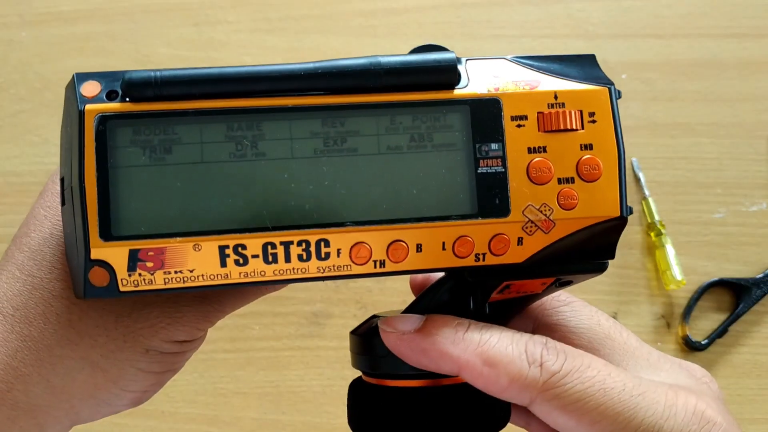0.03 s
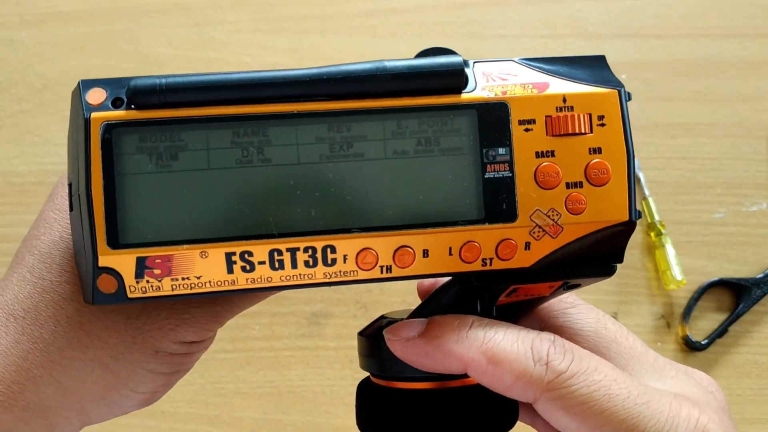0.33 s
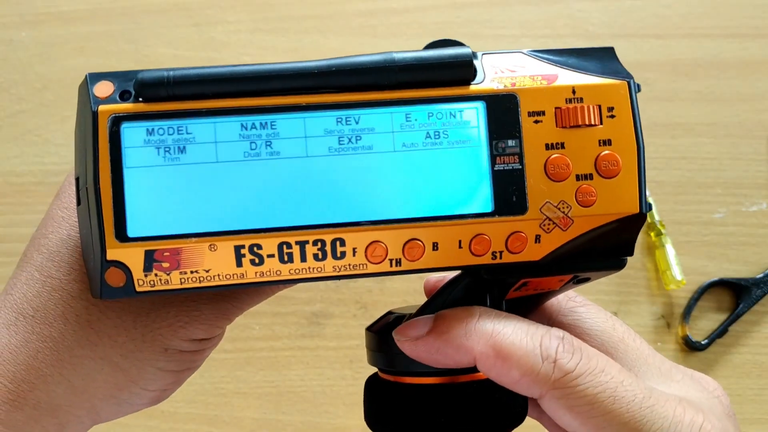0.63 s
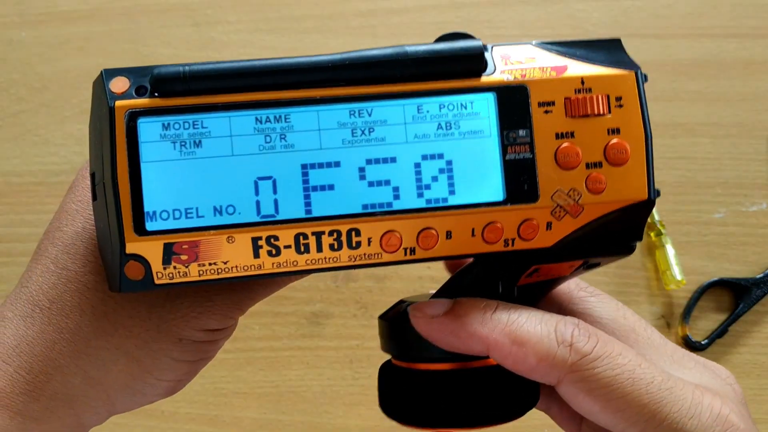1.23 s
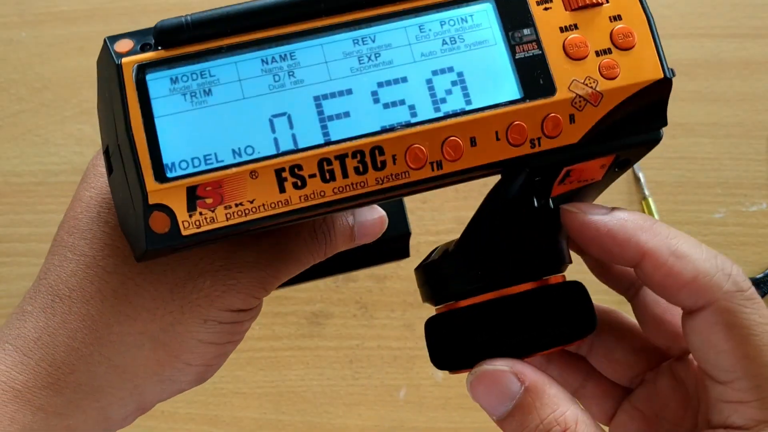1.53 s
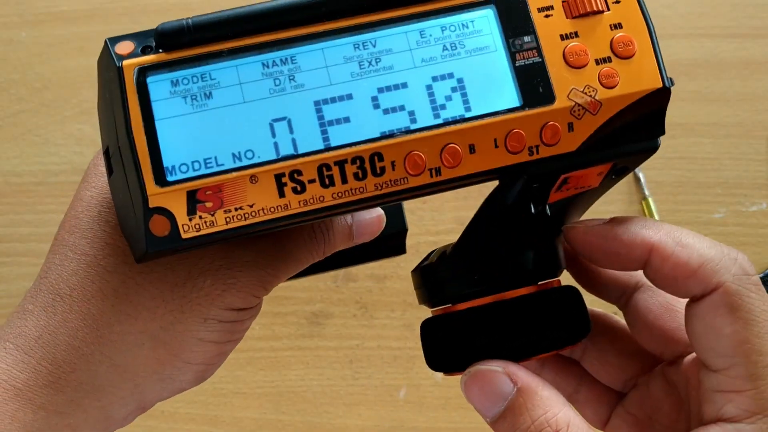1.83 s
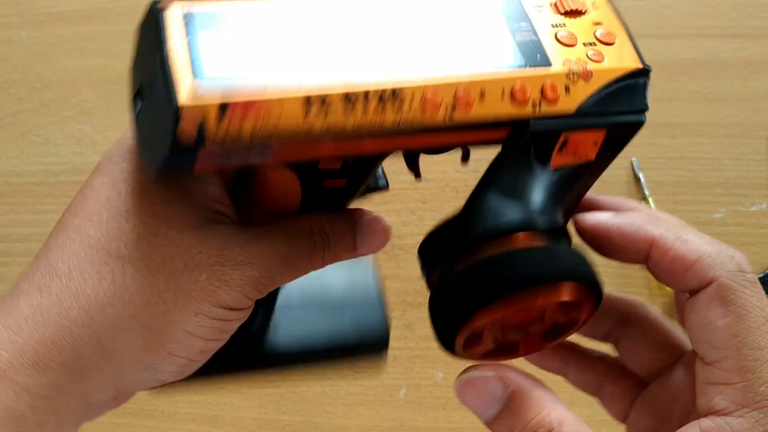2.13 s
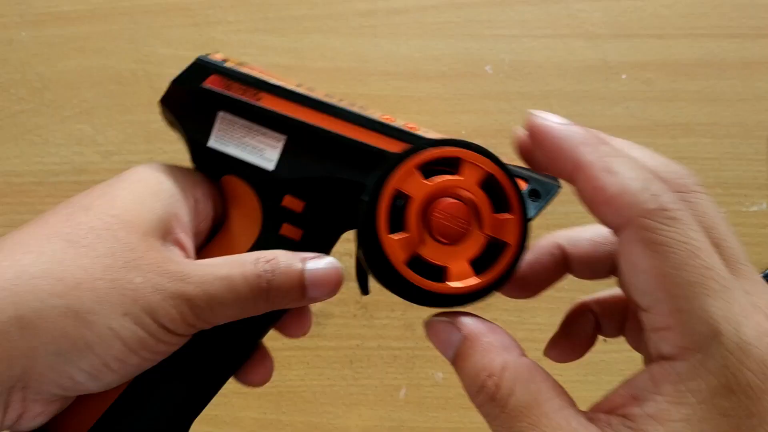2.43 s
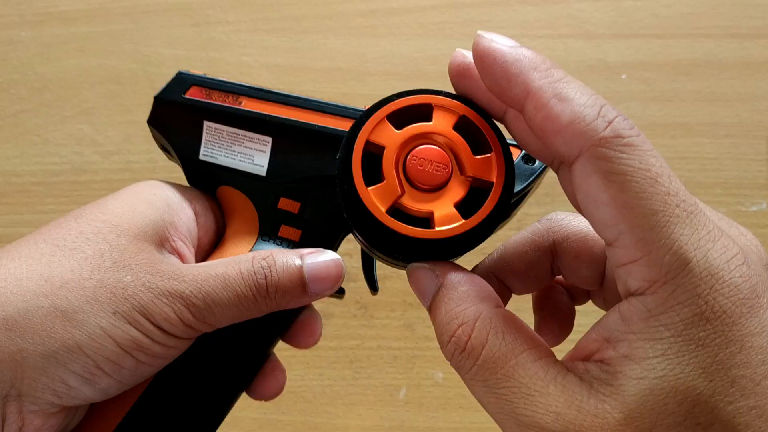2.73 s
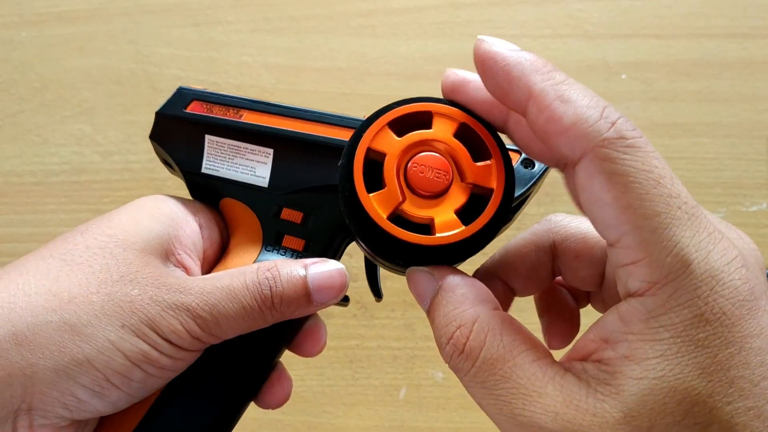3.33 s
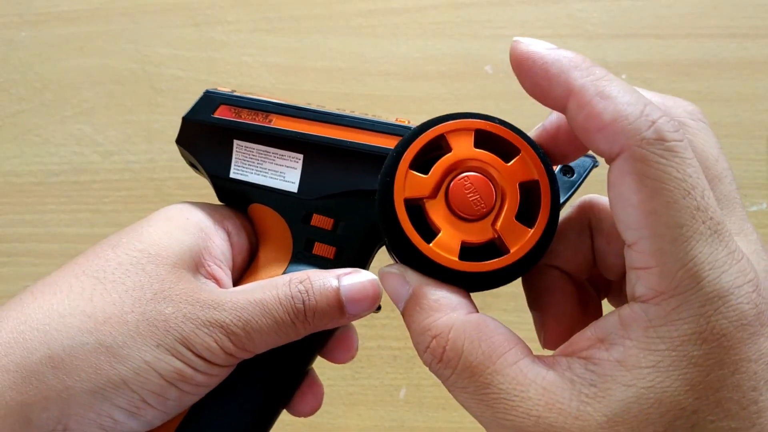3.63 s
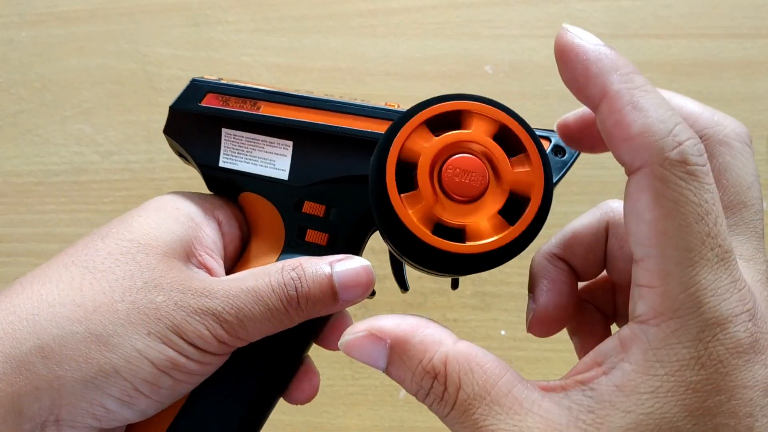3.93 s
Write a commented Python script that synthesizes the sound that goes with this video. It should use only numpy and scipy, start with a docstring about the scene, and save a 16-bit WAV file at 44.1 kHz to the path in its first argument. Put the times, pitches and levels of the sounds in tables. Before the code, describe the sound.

A remote controller's spring-loaded plastic wheel chatters twice, close by in a small room. First come a low rumble, faint hiss and soft hand rubs and bumps, with single ticks around 0.2, 1.2 and 2.4 seconds. From 2.6 to 3 seconds the released wheel rattles in much louder clicks, alternately dull and bright, getting faster and weaker as the hollow case rings. It repeats from 3.6 to 3.9 seconds.

```python
"""First a low rumble and faint hiss, with a few ticks, rubs and soft bumps as hands shift their grip on
a plastic radio transmitter, close by in a small room. Then its spring-loaded steering wheel is turned
and let go twice. Each time it chatters between the two stops of its centring spring, one dull and one
bright, ever faster and weaker, while the hollow case rings and the wheel's hub sings low underneath."""
import sys
import numpy as np
from scipy import signal
from scipy.fft import rfft, irfft
from scipy.io import wavfile

SR = 44100
rng = np.random.default_rng(int(sys.argv[2]) if len(sys.argv) > 2 else 0)


def master(y):
    """Save y as 16-bit WAV."""
    cut = np.clip(np.atleast_2d(y).T, -1, 1)
    pcm = np.round(cut * 32767)  # scale
    wavfile.write(sys.argv[1], SR, pcm.astype(np.int16))


N = 176400
T = np.arange(N) / SR
SHORT = 4096   # samples in one hit
ATTACK_S = 0.00048   # a contact takes this long to load

# Rides of the rumble and of its deepest part. Each row: time in seconds, level in dB.
RUMBLE_RIDE = [(0.0, -50), (0.42, -48), (0.48, -46.5), (0.62, -45.5), (0.75, -50.5), (0.77, -43.5),
               (0.85, -49), (0.96, -45.5), (1.53, -48.5), (1.56, -43), (2.21, -44), (2.52, -61),
               (3.01, -57), (3.34, -51.5), (3.7, -58.5), (3.91, -54.5), (4.0, -58)]
DEEP_RIDE = [(1.5, -67), (1.8, -56), (2.0, -59.5), (2.15, -55.5), (2.35, -72)]
# Tone of the rumble, the hiss, a tick's snap and a rub. Each row: frequency in Hz, gain in dB.
RUMBLE_EQ = [(40, -49), (100, -34), (130, -41), (160, -16.5), (200, -3.5), (228, -5), (250, 5), (275, -4),
             (300, -2.5), (360, -17), (440, -10.5), (620, -33), (1500, -50)]
HISS_EQ = [(290, -13), (500, -2), (914, -5.5), (1650, -7.5), (2500, -10), (3900, -13.5), (8720, -16),
           (15500, -20.5)]
SNAP_EQ = [(200, -38), (800, 3), (2000, 1), (3500, -3), (8000, -3.5), (16000, -8)]
RUB_EQ = [(100, -34), (800, -12.5), (2500, -1), (5000, 1), (9000, 3.5), (16000, -9)]
# Plastic ticks. Each row: start in seconds, level in dB, lower and upper resonance in Hz,
# snap against body in dB, t60 in seconds.
TICKS = [(0.2078, -21.5, 2760, 3430, -3, 0.009), (1.1995, -24.5, 950, 1880, 8.5, 0.016),
         (2.425, -26, 550, 1300, 0, 0.023), (2.498, -44, 1500, 2730, -12, 0.02)]
# Skin rubs. Each row: start and length in seconds, level in dB, tilt in dB per octave.
RUBS = [(0.212, 0.3, -52, -9.5), (0.466, 0.24, -54, -9.5), (1.047, 0.2, -56.5, 5), (1.191, 0.2, -49, -6.5),
        (1.637, 0.61, -59, 2), (2.01, .17, -51, -8.5)]
# Bumps of the grip. Each row: start in seconds, level in dB.
BUMPS = [(0.991, -40), (1.633, -37)]
# The wheel hits its two stops in turn. Each row: time in seconds, strength in dB.
STRIKES = [(2.6465, 1.5), (2.6716, 3.5), (2.6930, 1.5), (2.7152, 3), (2.7365, 0), (2.7568, 3),
           (2.7762, -2.5), (2.7954, 3.5), (2.8123, -2.5), (2.8301, 1.5), (2.8457, -3.5), (2.8615, 1.5),
           (2.8762, -2.5), (2.8889, 0.5), (2.901, -11.5), (2.914, 0), (2.9236, -11.5), (2.9338, 0),
           (2.9419, -12), (2.9513, -2.5), (2.9595, -32), (2.9651, -3.5), (2.971, -22.5), (2.9759, -13),
           (2.9808, -39), (2.985, -7.5), (2.9925, -45), (2.999, -27), (3.005, -22), (3.6041, 2),
           (3.6253, 0), (3.6475, 2), (3.6667, -1), (3.6877, 2), (3.7054, -2.5), (3.7242, 2), (3.7404, -3.5),
           (3.7571, 0), (3.7713, -6), (3.7865, 0.5), (3.8001, -6), (3.8118, -0.5), (3.8236, -10),
           (3.834, -1.5), (3.8446, -11.5), (3.8533, -1), (3.8608, -16), (3.8685, -4), (3.8758, -22),
           (3.8816, -6.5), (3.8870, -35), (3.8924, -8.5), (3.8967, -38), (3.8985, -16), (3.9060, -46),
           (3.912, -38)]
# Crack of each stop. Each row: frequency in Hz, gain in dB.
DULL_STOP_EQ = [(60, -37), (350, -18), (650, -21.5), (850, -6.5), (1050, -25), (1320, -29), (1480, -0.5),
                (1650, -2), (1900, -4), (2800, -9), (3250, 6.5), (4000, -7.5), (4500, -9), (5000, -1.5),
                (5900, -2.5), (7200, 0), (8100, -2.5), (8600, -3), (9300, 5), (10200, 3), (10700, 2),
                (11400, -4), (12200, 0.5), (13300, -9), (16000, -14)]
BRIGHT_STOP_EQ = [(60, -30), (350, -16), (650, -20), (850, -16), (1050, -13), (1320, -19), (1500, -29),
                  (1900, -3), (2600, 0.5), (3250, 0), (3600, 2.5), (4150, -0.5), (4600, 4), (5400, -1.5),
                  (6000, 6), (7200, -1.5), (8100, 3), (8700, -0.5), (10200, -12), (10800, 3.5),
                  (11300, -5.5), (12100, 2.5), (13300, -9.5), (16000, -13.5)]
# Ring of the case. Each row: pitch in Hz, dB from the dull stop, dB from the bright stop, t60 in seconds.
CASE_MODES = [(1490, -29, -44, 0.038), (1900, -33, -52, 0.024), (2363, -33, -31, 0.043),
              (2505, -25, -34, 0.032), (3200, -18.5, -25.5, 0.027), (3470, -25, -26, 0.013),
              (4530, -36, -19, 0.0076), (6020, -15, -32, .009), (8180, -15, -22, 0.0087),
              (10300, -18, -28, .01)]
# Placement of the strikes. Each row: frequency in Hz, left over right in dB.
STRIKE_PAN = [(500, -2), (1200, 2.5), (3500, 1), (6000, -2), (8000, 2.5), (10800, -5), (12700, 3),
              (16000, -6.5)]
# Low ring of wheel and spring. Each row: pitch in Hz, level in dB, t60 in seconds,
# dB gained as the swing dies.
HUB_MODES = [(565, -52, 0.097, 8.5), (756.5, -47.5, 0.048, 5), (852, -51.5, 0.028, 11),
             (1139, -34, 0.065, -9)]
# Slaps off table and walls. Each row: left and right delay in seconds, level in dB.
ECHOES = [(.0023, 0.0047, -14), (0.0137, 0.0127, -15), (0.0167, .0168, -13)]
# Room tail. Each row: frequency in Hz, gain in dB, t60 in seconds.
ROOM_TAIL = [(200, -18, 0.16), (804, -3, 0.29), (1300, -3.5, 0.52), (1950, -1, 0.18), (3200, -5.5, 0.34),
             (5700, -7, 0.34), (9900, -10.5, 0.3), (15000, -8, 0.28)]
# Stereo image of hiss and rubs, clicks and room. Each row: frequency in Hz, left-right likeness (1 is mono).
HISS_LIKENESS = [(300, 0.29), (1000, 0.06), (3000, 0.033), (12000, 0.027)]
CLICK_LIKENESS = [(200, 0.71), (1400, 0.93), (2500, 0.27), (4000, 0.084), (6000, -0.29), (15000, -0.3)]
ROOM_LIKENESS = [(200, 0.24), (1000, 0.088), (2500, 0.01), (12000, 0)]


def from_db(db):
    """Decibels to gain."""
    return 10 ** (np.asarray(db) / 20)


def at_hz(points, hz):
    """Read a curve on a log-frequency axis."""
    points = np.array(points)
    return np.interp(np.log(hz + 1), np.log(points[:, 0]), points[:, 1])


def bins(size):
    """Frequencies of a spectrum."""
    return np.fft.rfftfreq(size, 1 / SR)


def unit(x):
    """Scale to an average energy of one per channel."""
    return x / np.sqrt(np.mean(np.sum(x ** 2, axis=-1)) + 1e-20)


def colour(x, db):
    """Minimum-phase EQ with a gain for each frequency bin."""
    size = x.shape[-1]
    cepstrum = irfft(np.log(from_db(db)), size)
    cepstrum[1:size // 2] *= 2
    cepstrum[size // 2 + 1:] = 0
    return irfft(rfft(x) * np.exp(rfft(cepstrum)), size)


def widen(pair, likeness):
    """Two unrelated signals become the mid and side of a stereo image."""
    alike = np.clip(at_hz(likeness, bins(pair.shape[-1])), -.98, .98)
    mid = colour(pair[0], 10 * np.log10(1 + alike))
    side = colour(pair[1], 10 * np.log10(1 - alike))
    return np.array([mid + side, mid - side]) / np.sqrt(2)


def noise(eq_db, likeness):
    """Steady stereo noise, rms 1."""
    white = widen(rng.standard_normal((2, N)), likeness)
    return unit(colour(white, eq_db)) * np.sqrt(N)


def burst(white, t60):
    """Dense, quickly dying stereo vibration with an even spectrum."""
    fade = from_db(-60 * T[:SHORT] / t60) * (1 - np.exp(-T[:SHORT] / ATTACK_S))
    x = widen(white, CLICK_LIKENESS) * fade
    for _ in range(4):
        flattened = irfft(np.exp(1j * np.angle(rfft(x))))
        x = flattened * fade ** (1 / 8)
    return unit(x)


def ring(hz, t60, phase=0):
    """One dying mode."""
    t = T[:SHORT]
    return np.sin(2 * np.pi * hz * t + phase) * from_db(-60 * t / t60) * (1 - np.exp(-t / ATTACK_S))


def add(out, start, sound):
    """Drop a hit into the mix, start in seconds."""
    i = int(start * SR)
    out[:, i:i + SHORT] += sound[..., :N - i]


def background(hiss_db=-55, deep_hz=145):
    """The bed: a low rumble that comes and goes under steady hiss."""
    hz, near_mono = bins(N), [(250, 0.89)]
    rumble = from_db(np.interp(T, *np.transpose(RUMBLE_RIDE))) * noise(at_hz(RUMBLE_EQ, hz), near_mono)
    octaves_away = np.abs(np.log2((hz + 1) / deep_hz)).clip(0, 2)
    deep = from_db(np.interp(T, *np.transpose(DEEP_RIDE))) * noise(-40 * octaves_away, near_mono)
    hiss = from_db(hiss_db) * noise(at_hz(HISS_EQ, hz), HISS_LIKENESS)
    low_cut = signal.butter(2, 160, "high", fs=SR, output="sos")
    return rumble + deep + signal.sosfilt(low_cut, hiss)


def ticks():
    """Plastic ticks under the fingers: a snap on top of two body resonances."""
    out = np.zeros((2, N))
    for start, db, low_hz, high_hz, snap_db, t60 in TICKS:
        crack = burst(rng.standard_normal((2, SHORT)), t60)
        peaks = [signal.iirpeak(hz, Q=4, fs=SR) for hz in (low_hz, high_hz)]
        body = sum(unit(signal.lfilter(*peak, signal.lfilter(*peak, crack))) for peak in peaks)
        snap = from_db(snap_db) * unit(colour(crack, at_hz(SNAP_EQ, bins(SHORT))))
        add(out, start, from_db(db) * (body + snap))
    return out


def rubs(rise_share=0.14):
    """Skin slides over the case: friction noise that swells quickly and fades."""
    out, hz = 0, bins(N)
    for start, length, db, tilt in RUBS:
        swell = np.interp(T, [start, start + rise_share * length, start + length], [0, 1, 0])
        eq_db = at_hz(RUB_EQ, hz) + tilt * np.log2(1 + hz / 500)
        out = out + from_db(db) * swell * noise(eq_db, HISS_LIKENESS)
    return out


def bumps():
    """The hands bump the case: soft, low thuds."""
    out = np.zeros((2, N))
    for start, db in BUMPS:
        add(out, start, from_db(db) * ring(hz=70, t60=0.013))
    return out


def case_ring(side, detune=0.0094, spread_db=1.5):
    """The hollow case rings from one strike; the grip shifts its modes a little each time."""
    out = 0
    for hz, *db_by_stop, t60 in CASE_MODES:
        stereo_phase = np.arccos(at_hz(CLICK_LIKENESS, hz)) / 2 * np.array([[1], [-1]])
        strength = rng.choice([-1, 1]) * from_db(db_by_stop[side] + spread_db * rng.normal())
        out = out + strength * ring(hz * (1 + detune * rng.normal()), t60, stereo_phase)
    return out


def stop_strikes(side, eq, crack_db, fresh_share=0.47, tilt_per_octave=0.37, pivot_hz=4180):
    """The wheel hits one stop: a crack with that stop's own grain, plus the ring of the case."""
    out, hz = np.zeros((2, N)), bins(SHORT)
    own_grain = rng.standard_normal((2, SHORT))
    pan_db = at_hz(STRIKE_PAN, hz) / 2
    octaves = np.log2(np.maximum(hz, 650) / pivot_hz)
    for start, db in STRIKES[side::2]:
        fresh_grain = rng.standard_normal((2, SHORT))
        grain = np.sqrt(1 - fresh_share) * own_grain + np.sqrt(fresh_share) * fresh_grain
        crack = unit(colour(burst(grain, t60=0.0115), at_hz(eq, hz)))
        left, right = from_db(crack_db) * crack + case_ring(side)
        gain_db = db * (1 + tilt_per_octave * octaves)   # weak strikes lose their treble first
        hit = np.array([colour(left, gain_db + pan_db), colour(right, gain_db - pan_db)])
        add(out, start - 0.0003, hit)   # contact begins just before the strike lands
    return out


def hub_ring(pitch_rise=0.058, full_swing_s=0.021, crossfade_s=0.0034, last_t60=0.02):
    """Each strike chokes and renews the wheel's low ring, which climbs as the swings get shorter."""
    out, starts = np.zeros((2, N)), np.array(STRIKES)[:, 0]
    fade_in = np.clip(T[:SHORT] / crossfade_s, 0, 1)
    for start, gap in zip(starts, np.diff(starts, append=T[-1])):
        last = gap > 2 * full_swing_s   # final strike of a chatter
        spent = 1 if last else np.clip(1 - gap / full_swing_s, 0, 1)
        choke = np.clip(1 - (T[:SHORT] - gap) / crossfade_s, 0, 1)
        for hz, db, t60, swell_db in HUB_MODES:
            phase = 2 * np.pi * hz * start + rng.normal(0, 0.81)
            tone = ring(hz * (1 + pitch_rise * spent), last_t60 if last else t60, phase)
            add(out, start, from_db(db + swell_db * spent) * fade_in * choke * tone)
    return out


def echoes(x):
    """Table and walls throw each channel back to the opposite side."""
    out = 0
    for left_s, right_s, db in ECHOES:
        slap = np.array([np.interp(T - left_s, T, x[1]), np.interp(T - right_s, T, x[0])])
        out = out + from_db(db) * slap
    return out


def room(x, predelay_s=0.003):
    """Diffuse tail of the small room, hanging longest in the mids."""
    size, table = SR // 2, np.array(ROOM_TAIL)
    white, tail = widen(rng.standard_normal((2, size)), ROOM_LIKENESS), 0
    edges_hz = np.geomspace(100, 18000, 13)
    for low, high in zip(edges_hz, edges_hz[1:]):
        hz = np.sqrt(low * high)
        band = irfft(rfft(white) * ((bins(size) >= low) & (bins(size) < high)), size)
        t60 = at_hz(table[:, ::2], hz)
        fade = unit(from_db(-60 * T[:size] / t60) * (T[:size] > predelay_s))
        tail = tail + from_db(at_hz(table, hz)) * band * fade
    return signal.fftconvolve(x, tail, axes=1)[:, :N]


def scene(room_send_db=-5):
    """Hands and wheel up close over the bed; each stop excites the room in its own way."""
    dull = stop_strikes(0, DULL_STOP_EQ, crack_db=4.5)
    bright = stop_strikes(1, BRIGHT_STOP_EQ, crack_db=1.5)
    hub_and_hands = hub_ring() + ticks() + bumps()
    near = dull + bright + hub_and_hands
    tail = room(dull) + room(bright) + room(from_db(room_send_db) * hub_and_hands)
    return near + echoes(near) + tail + rubs() + background()


def record(dry):
    """A steep high cut at 15.8 kHz."""
    return signal.sosfilt(signal.ellip(10, .1, 80, 15800, fs=SR, output="sos"), dry)


dry = scene()
out = record(dry)
master(out)
```